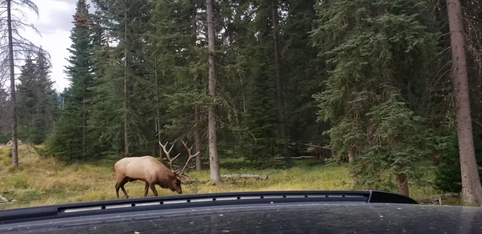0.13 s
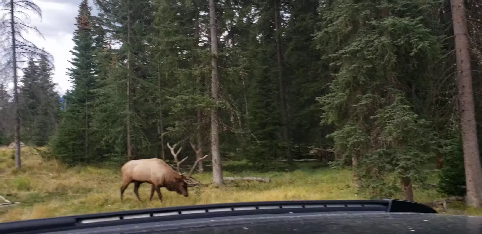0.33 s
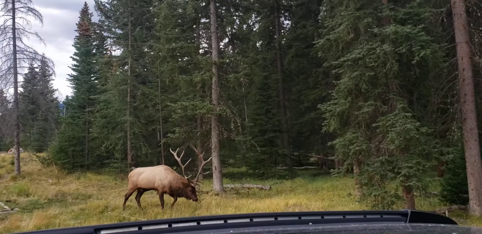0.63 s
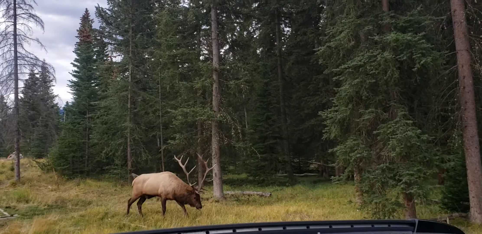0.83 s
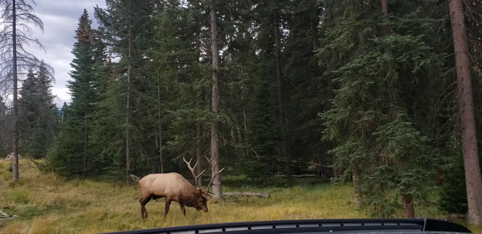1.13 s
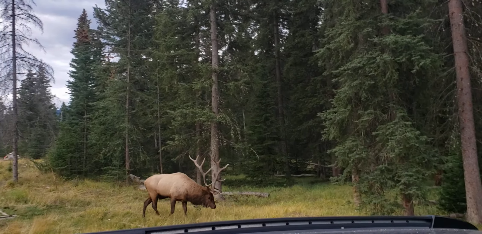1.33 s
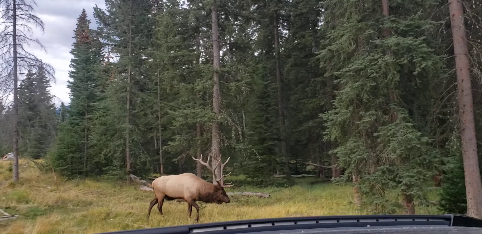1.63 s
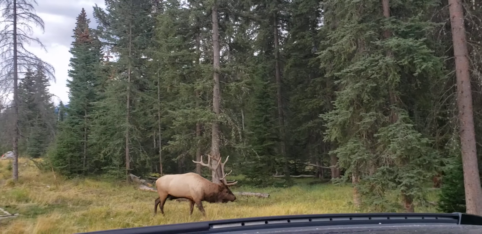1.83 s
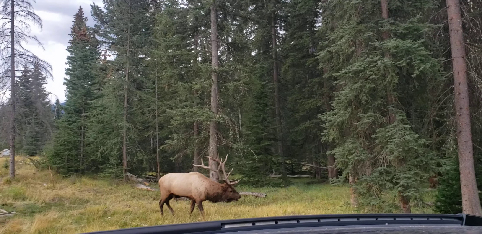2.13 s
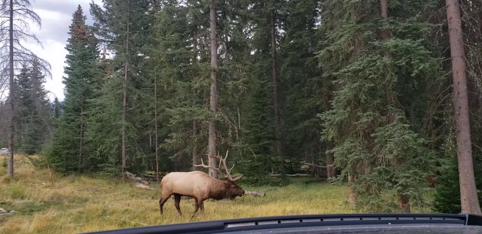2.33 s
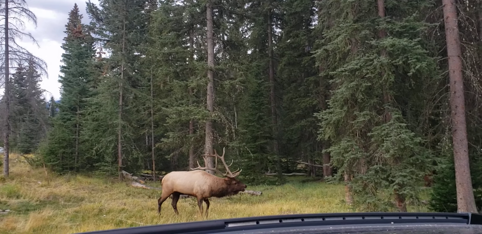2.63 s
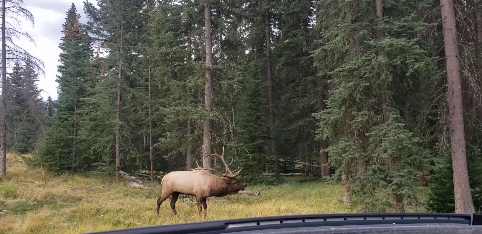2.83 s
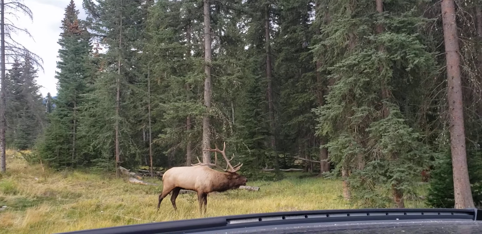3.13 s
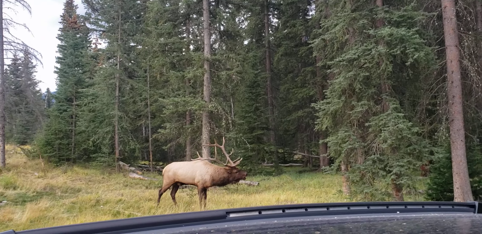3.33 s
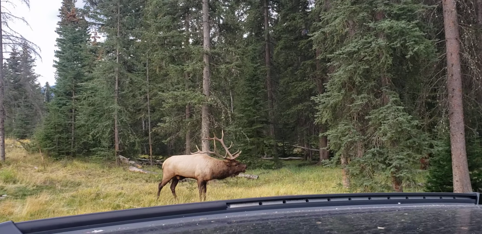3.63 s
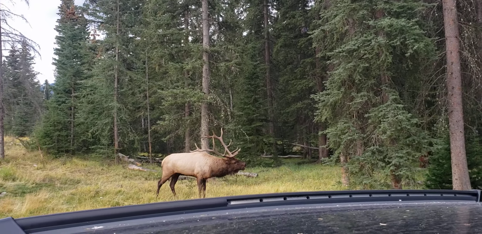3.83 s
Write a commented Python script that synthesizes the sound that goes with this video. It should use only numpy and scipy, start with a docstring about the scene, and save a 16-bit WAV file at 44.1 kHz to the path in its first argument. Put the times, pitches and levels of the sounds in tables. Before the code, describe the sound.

An elk's bugle dominates the second half. First, low engine rumble and faint forest air, with left-side wind bumps until about 0.5 s, a sharp knock on the right near 0.6 s, and close crackle, ticks and rustle, busiest again at 1.4-1.8 s. From 2.1 s a soft grunt and thin whistle climb in steps; at 2.75 s it breaks into a harsh, buzzing, growling scream, echoing off trees, turning hoarse and whistling near 4 s.

```python
"""Bull elk bugling in a forest clearing

Hand-held camera with two microphone ports, beside an idling car; the bull calls from across the clearing.
A thin whistle, a bent sine with overtones, climbs in steps. Then the vocal folds join in: pulses and puffs
ring the throat as growl and rasp, and a tone sweeps up once a fold cycle for the harsh scream. Decaying
noise scatters the call as echoes off the trees. Close by: wind bumps on the left port (short swelling low
tones), ticks, a knock, crackle and rustle of the hand (coloured noise bursts), rumble, hum, air and hiss."""
import sys
import numpy as np
from scipy import signal
from scipy.fft import rfft, irfft
from scipy.io import wavfile
from scipy.ndimage import uniform_filter1d

SR = 44100
rng = np.random.default_rng(int(sys.argv[2]) if len(sys.argv) > 2 else 0)


def waveform_to_disk(signal):
    """Save audio, clipped to [-1, 1], as 16-bit WAV at the path in sys.argv[1]."""
    frames = np.transpose(np.atleast_2d(signal))
    scaled = np.clip(frames, -1, 1) * 32767
    samples = np.round(scaled).astype(np.int16)
    wavfile.write(sys.argv[1], SR, samples)


N = 176400
T = np.arange(N) / SR


def undb(db):
    """Decibels to gain."""
    return 10 ** (np.asarray(db) / 20)


def curve(table, axis=1):
    """One column of a table, joined by straight lines in time."""
    rows = np.array(table, float)
    return np.interp(T, rows[:, 0], rows[:, axis])


def unit(x):
    """Scale to rms 1."""
    return x / np.sqrt(np.mean(x ** 2))


def noise():
    """White noise of rms 1."""
    return rng.standard_normal(N)


def walk(rate):
    """Smooth random wander with a spread of 1; a higher rate wanders faster."""
    width = max(int(SR / rate), 2)
    return unit(uniform_filter1d(uniform_filter1d(noise(), width), width))


def turning(hz):
    """Phase in radians of a tone whose pitch follows hz."""
    return 2 * np.pi * np.cumsum(hz) / SR


def colour(x, points, size=8192):
    """Causal minimum-phase filter whose response follows (f/Hz, level/dB) points."""
    hz, db = np.array(points, float).T
    f = np.maximum(np.arange(size // 2 + 1) * SR / size, 1)
    log_gain = np.log(undb(np.interp(np.log(f), np.log(hz), db)))
    # folding the cepstrum forward in time makes the filter causal
    cepstrum = irfft(log_gain)
    cepstrum[1:size // 2] *= 2
    cepstrum[size // 2 + 1:] = 0
    response = irfft(np.exp(rfft(cepstrum)))
    return signal.fftconvolve(x, response)[:N]


def pan(x, db):
    """Place a sound by its left minus right level."""
    return np.array([x * undb(db / 2), x * undb(-db / 2)])


def wide(points, side_db):
    """Coloured stereo noise: a middle of rms 1 and an independent side signal."""
    mid = unit(colour(noise(), points))
    side = unit(colour(noise(), points))
    return mid + undb(side_db) * np.array([side, -side])


def fade(start, decay):
    """Sudden start, exponential decay."""
    return (T >= start) * np.exp(-np.abs(T - start) / decay)


# colour of the microphone hiss: f/Hz, level/dB
HISS_COLOUR = [(3000, -16), (8500, -11.5), (11500, 1.5), (15500, 1.5)]
HISS_DB = -81.5


def hiss():
    """Steady treble noise of the microphones."""
    return wide(HISS_COLOUR, side_db=0) * undb(HISS_DB)


# colour of the forest air: f/Hz, level/dB
AIR_COLOUR = [(40, -15), (150, 3.5), (320, 7.5), (650, 5.5), (1100, -1.5), (1700, -26.5), (2400, -17),
              (3200, -46.5), (5000, -63.5), (7500, -70), (9000, -60)]
AIR_DB, AIR_SIDE_DB = -61, -6


def forest_air():
    """Faint air around the clearing: soft noise whose level wavers slightly."""
    return wide(AIR_COLOUR, AIR_SIDE_DB) * undb(AIR_DB + 0.93 * walk(15))


# partials of the engine hum: f/Hz, level/dB
ENGINE_HUM = [(52, -55), (103, -57.5)]
# colour of the car's rumble: f/Hz, level/dB
RUMBLE_COLOUR = [(15, -21.5), (28, -22.5), (42, 1.5), (54, 0.5), (70, 3), (102, -4.5), (122, -7.5),
                 (170, -24.5), (260, -36), (600, -66)]
# the rumble as it rises and falls: t/s, level/dB
RUMBLE_LEVEL = [(0, -43.5), (.55, -45.5), (.7, -49), (1.03, -54), (1.15, -46), (1.27, -53), (1.7, -49),
                (2.6, -48), (4, -50)]
RUMBLE_SIDE_DB = -10


def idling_car():
    """Low noise for the rumble, and two unsteady tones for the engine's hum."""
    hum = 0
    for hz, db in ENGINE_HUM:
        level = np.sqrt(2) * undb(db + 2 * walk(5.4))
        hum = hum + level * np.sin(turning(hz * (1 + 0.027 * walk(8.1))))
    return hum + wide(RUMBLE_COLOUR, RUMBLE_SIDE_DB) * undb(curve(RUMBLE_LEVEL))


# wind bumps at the left port: t/s where the swell peaks, level/dB, f/Hz
WIND_BUMPS = [(0.099, -32, 66), (.125, -28, 44.7), (0.194, -27, 71), (.28, -27, 50.7), (0.336, -30.5, 59.3),
              (0.392, -19.5, 73.6), (0.426, -25, 56)]
BUMP_S, BUMP_RIGHT_DB = 0.016, -41  # twice the rise time; right port relative to left
BUMP_CRUNCH = 0.52  # strength of the near-octave partial at the peak


def wind():
    """Short bumps of air, quick to rise and slower to fall, almost all on the left port."""
    left = 0
    for peak, db, hz in WIND_BUMPS:
        age = np.maximum(T - peak + BUMP_S / 2, 0)
        rise = age / BUMP_S * 2
        swell = rise * np.exp(1 - rise)
        phase = 2 * np.pi * hz * age
        bump = np.sin(phase) + BUMP_CRUNCH * swell * np.sin(1.97 * phase)
        left = left + undb(db) * swell * bump
    return np.array([left, left * undb(BUMP_RIGHT_DB)])


# skin sliding on the camera: t/s, level/dB
SLIDE_LEVEL = [(0, -76), (.1, -89), (.3, -80), (.42, -81), (.57, -84), (.61, -72.5), (.74, -74),
               (.86, -83.5), (.95, -99)]
# its colour: f/Hz, level/dB
SLIDE_COLOUR = [(2000, -26), (3100, -14.5), (3700, 1.5), (5200, 1.5), (5800, -19), (6500, -10.5),
                (7600, -9.5), (8500, -28)]


def sliding_skin():
    """Friction hiss of skin on the camera body, as treble noise."""
    return wide(SLIDE_COLOUR, side_db=-3.5) * undb(curve(SLIDE_LEVEL))


# crackle of the shifting grip: t/s, level/dB
CRACKLE_LEVEL = [(0, -55), (.2, -72), (.32, -57), (.42, -77), (.62, -65), (.8, -66.5), (.95, -89),
                 (1.3, -71.5), (1.37, -69), (1.42, -57), (1.49, -66), (1.55, -62), (1.68, -56),
                 (1.78, -60.5), (1.88, -79.5), (4, -84.5)]
# its colour: f/Hz, level/dB
CRACKLE_COLOUR = [(200, -2.5), (700, 5.5), (1300, 6), (2100, -4), (3000, -15.5), (4300, -17.5),
                  (7000, -25.5), (9000, -34), (15000, -33.5)]
CRACKLES_PER_S, CRACKLE_SPREAD_DB = 220, 2.5


def crackle():
    """Dense tiny clicks of the grip at random moments, of either sign and uneven size."""
    clicks = (rng.random(N) < CRACKLES_PER_S / SR) * rng.choice([-1, 1], N)
    size_db = CRACKLE_SPREAD_DB * np.minimum(rng.exponential(size=N), 3)
    coloured = unit(colour(clicks * undb(size_db), CRACKLE_COLOUR))
    return pan(coloured * undb(curve(CRACKLE_LEVEL)), 1.6)


# rustle of the hand: t/s, level/dB
RUSTLE_LEVEL = [(0, -58), (.33, -61.5), (.45, -65), (.62, -63.5), (.8, -63), (.95, -67.5), (1.3, -65.5),
                (1.42, -57.5), (1.49, -62), (1.76, -59.5), (1.86, -64), (2.08, -67), (2.15, -60.5),
                (2.7, -57), (4, -52)]
# its colour: f/Hz, level/dB
RUSTLE_COLOUR = [(200, -8), (700, 7), (1300, 1), (2200, -6), (3000, -19.5), (4600, -23), (6000, -21.5),
                 (7400, -23), (8600, -47.5)]


def rustle():
    """Hand moving at the microphone: stereo noise with a quick, grainy level."""
    return wide(RUSTLE_COLOUR, side_db=2.0) * undb(curve(RUSTLE_LEVEL) + 0.78 * walk(63))


# handling ticks: t/s, peak level/dB before the shared gain and panning, left minus right/dB
HANDLING_TICKS = [(0.253, -42.5, 5), (0.348, -39, 3), (0.594, -39, 4), (0.76, -48.5, 1), (0.789, -46, 2),
                  (1.278, -51, 0.5), (1.39, -35, 3), (1.414, -42, 5), (1.423, -42, 6), (1.444, -47, 5),
                  (1.531, -45, 3), (1.55, -45, 1), (1.628, -45, 1.5), (1.637, -36.5, 4), (1.666, -42.5, 1),
                  (1.706, -38, 1.5), (1.765, -36, 3.5), (1.776, -45, 1), (2.157, -47, -8), (2.325, -45, 3),
                  (2.596, -40, 3), (2.629, -44, 3.5)]
# colour of a tick: f/Hz, level/dB
TICK_COLOUR = [(200, 9), (700, 10.5), (1300, 16.5), (2100, 2.5), (3000, -14), (4200, -19.5), (7000, -26),
               (9000, -30), (15000, -39)]
TICK_DECAY_S, TICK_GAIN_DB = 0.0021, 2


def ticks():
    """Small contacts on the camera: coloured noise bursts that die within milliseconds."""
    out = 0
    for start, db, pan_db in HANDLING_TICKS:
        tick = colour(fade(start, TICK_DECAY_S) * noise(), TICK_COLOUR)
        out = out + pan(tick / np.abs(tick).max() * undb(db + TICK_GAIN_DB), pan_db)
    return out


# colour of the knock: f/Hz, level/dB
KNOCK_COLOUR = [(60, -5), (150, 11.5), (500, 5.5), (1000, -2.5), (1800, 0.5), (2600, -12.5), (4300, -7.5),
                (6000, -23), (9000, -41), (15000, -40)]
KNOCK_S, KNOCK_DB, KNOCK_PAN_DB = .5722, -25.5, -22.5  # start; peak before panning; left minus right
KNOCK_RING_DB, KNOCK_RING_S = -25, 0.0038  # noise after the blow: level below it; decay


def knock():
    """One sharp knock on the camera body, to the right: an impulse and a short noisy ring."""
    impulse = np.arange(N) == int(KNOCK_S * SR)
    ring = undb(KNOCK_RING_DB) * fade(KNOCK_S, KNOCK_RING_S) * noise()
    blow = colour(impulse + ring, KNOCK_COLOUR)
    return pan(blow / np.abs(blow).max() * undb(KNOCK_DB), KNOCK_PAN_DB)


# Levels of the call's voices are those at the elk, before direct gain, ports, panning and echo.
GRUNT_S, GRUNT_LEN_S, GRUNT_DB = 2.11, 0.082, -44  # centre; Gaussian half-width; level
GRUNT_HZ, GRUNT_SAG_HZ_PER_S = 125, 110  # pitch at the centre; rate of fall
# partials of the grunt: multiple of the pitch, level/dB
GRUNT_PARTIALS = [(1, 1), (2, -16), (5, -8)]


def grunt():
    """A soft low falling note, voiced under the start of the whistle."""
    phase = turning(GRUNT_HZ - GRUNT_SAG_HZ_PER_S * (T - GRUNT_S))
    tone = sum(undb(db) * np.sin(round(multiple) * phase) for multiple, db in GRUNT_PARTIALS)
    return tone * np.exp(-((T - GRUNT_S) / GRUNT_LEN_S) ** 2) * undb(GRUNT_DB)


# hoarse air as the scream breaks up: t/s, level/dB
HOARSE_LEVEL = [(3.76, -80.5), (3.83, -53), (3.9, -39.5), (3.96, -45), (4, -49)]
# its colour: f/Hz, level/dB
HOARSE_COLOUR = [(250, -26.5), (600, -8), (920, 2), (1100, -3.5), (1400, 5.5), (2000, -4.5), (2600, -2.5),
                 (3000, -6), (3300, -30.5), (4400, -19), (5200, -36), (8000, -46), (9500, -63)]


def hoarse(turns):
    """Gusts of air, one a fold cycle, tear through the folds as the scream breaks up."""
    gusts = (1 + .5 * np.cos(2 * np.pi * turns)) * noise()
    return unit(colour(gusts, HOARSE_COLOUR)) * undb(curve(HOARSE_LEVEL))


# thin squeal that falls into the closing whistle: t/s, f/Hz, level/dB
SQUEAL_PATH = [(3.52, 2680, -88), (3.62, 2676, -48.5), (3.79, 2690, -54), (3.85, 2930, -55),
               (3.905, 2970, -48), (3.95, 2720, -44), (3.975, 2650, -48), (3.995, 2400, -78)]


def squeal(turns):
    """A second, higher whistle, shaken in pitch and level once a fold cycle."""
    beat = np.sin(2 * np.pi * turns)
    tone = np.sin(turning(curve(SQUEAL_PATH) + 90 * beat))  # swings by 90 Hz
    return tone * (1 + .5 * beat) * undb(curve(SQUEAL_PATH, axis=2))


GROWL_FLICKER_DB, GROWL_FLICKER_PER_S = 2.3, 12  # spread and rate of the uneven swelling


def flicker(x):
    """Each narrow band of the growl swells and fades on its own."""
    f, spectrum = np.arange(N // 2 + 1) * SR / N, rfft(x)
    for hz in range(330, 1100, 85):
        band = irfft(spectrum * np.clip(1 - np.abs(f - hz) / 85, 0, 1), N)
        x = x + band * (undb(GROWL_FLICKER_DB * walk(GROWL_FLICKER_PER_S)) - 1)
    return x


# growl over the call: t/s, level/dB
GROWL_LEVEL = [(2.72, -75), (2.76, -54), (2.84, -42.5), (3.08, -37), (3.22, -36.5), (3.42, -37), (3.7, -38),
               (3.77, -45), (3.83, -38.5), (3.91, -39), (3.96, -43), (3.99, -48.5)]
# low throat resonances: f/Hz, level/dB
LOW_THROAT = [(60, -38.5), (85, 4.5), (130, -4.5), (170, -3), (210, -33.5), (255, -1), (295, -4),
              (335, -7.5), (415, -7), (500, 2.5), (570, 2), (655, 6.5), (720, -14), (790, -23.5), (870, -8),
              (935, 1.5), (1030, -21.5), (1200, -33.5), (1600, -71.5)]
# chest tone, the folds' second harmonic: t/s, level/dB
CHEST_LEVEL = [(2.75, -61.5), (2.9, -68), (3.2, -68), (3.4, -48.5), (3.75, -45.5), (3.92, -49), (3.98, -58)]
# rasp, strongest as the folds come apart: t/s, level/dB
RASP_LEVEL = [(2.72, -80), (2.765, -42), (2.84, -44), (3.1, -41), (3.45, -39.5), (3.75, -40), (3.86, -38),
              (3.95, -37), (3.99, -54)]
# high throat resonances: f/Hz, level/dB
HIGH_THROAT = [(600, -50), (1220, -26), (1410, 6.5), (1530, -7.5), (1735, 6), (1870, -2.5), (2100, 4),
               (2230, 0), (2450, 2.5), (2600, -7.5), (3200, -30.5), (3600, -33), (3820, -1.5), (3980, -37),
               (4180, -1), (4450, -12.5), (4800, -53.5), (5800, -19.5), (6600, -41.5), (7350, -21.5),
               (8300, -47), (12000, -77)]
GROWL_AIR, RASP_AIR = .16, .65  # puffs of air relative to the fold pulses
PUFF_DECAY = .25  # fold cycles


def folds(turns):
    """Fold pulses and puffs of air ring the low and high throat resonances."""
    hz = np.gradient(turns) * SR
    offset = ((turns + .5) % 1 - .5) * SR / hz  # samples from the nearest pulse
    pulses = unit(np.sinc(offset) * np.exp(-(offset / 6) ** 2)) * undb(.7 * walk(90))
    puffs = unit(np.exp(-(turns % 1) / PUFF_DECAY) * noise())
    growl = unit(flicker(colour(pulses + GROWL_AIR * puffs, LOW_THROAT))) * undb(curve(GROWL_LEVEL))
    chest = np.sqrt(2) * np.cos(4 * np.pi * turns) * undb(curve(CHEST_LEVEL))
    rasp = unit(colour(pulses + RASP_AIR * puffs, HIGH_THROAT)) * undb(curve(RASP_LEVEL))
    return growl + chest, rasp


# mouth's colour on the overtones of whistle and chirps: f/Hz, level/dB
MOUTH_COLOUR = [(2500, 2.5), (3200, -6.5), (3650, -5.5), (4150, 0), (4450, -12), (4900, -30), (5500, -15),
                (6200, 2), (6700, -8.5), (7300, 1), (8300, -30.5), (10000, -15.5), (12000, -17.5)]
# whistle pitch, climbing in steps and returning at the end: t/s, f/Hz
WHISTLE_PITCH = [(2.06, 690), (2.11, 715.4), (2.176, 900.4), (2.21, 982), (2.262, 1040), (2.28, 1257),
                 (2.31, 1304), (2.345, 1534), (2.37, 1596), (2.385, 1730), (2.42, 1825), (2.445, 1775),
                 (2.47, 1657), (2.49, 1745), (2.535, 1799), (2.6, 1954), (2.675, 2025), (2.73, 2202),
                 (2.748, 1765), (2.8, 1726), (3.955, 2078), (3.98, 2182)]
# whistle fundamental: t/s, level/dB
WHISTLE_LEVEL = [(2.05, -75), (2.08, -54), (2.112, -43), (2.145, -60), (2.185, -47), (2.222, -37.5),
                 (2.252, -38), (2.277, -57), (2.3, -52.5), (2.345, -49), (2.368, -38.5), (2.39, -44.5),
                 (2.44, -46.5), (2.458, -38.5), (2.495, -37.5), (2.535, -32.5), (2.575, -42.5),
                 (2.66, -40.5), (2.71, -38.5), (2.73, -40), (2.754, -29.5), (2.768, -38), (2.79, -41.5),
                 (2.85, -62), (3.0, -91), (3.92, -81), (3.965, -31), (3.988, -25.5)]
# roughness of the whistle: t/s, phase wobble/rad
WHISTLE_WOBBLE = [(2.05, .15), (2.25, .12), (2.32, .35), (2.37, .3), (2.41, .2), (2.455, .7), (2.485, .4),
                  (2.52, .15), (2.62, .2), (2.71, .08), (2.73, 1.3), (2.75, .15), (2.77, .6), (3.96, .6),
                  (3.985, .12)]
# harmonics 2 to 6 against each other: level/dB
OVERTONE_BALANCE = [0, -7, -7, -11, -17]
# all overtones together, before the mouth: t/s, level/dB
OVERTONE_LEVEL = [(2.1, -80), (2.17, -64), (2.24, -67), (2.3, -62), (2.34, -58), (2.38, -65), (2.45, -68),
                  (2.53, -67), (2.6, -71), (2.66, -62), (2.705, -56), (2.74, -70), (2.85, -90), (3.95, -82),
                  (3.99, -61)]
WHISTLE_SCATTER_HZ, OVERTONE_FLICKER_DB = 12, 2.5  # wander of pitch; spread as overtones come and go


def whistle():
    """A near-pure tone that climbs in steps and turns ragged at the breaks."""
    rough = curve(WHISTLE_WOBBLE)
    phase = turning(curve(WHISTLE_PITCH) + WHISTLE_SCATTER_HZ * walk(120)) + rough * walk(450)
    ragged = (1 + .6 * rough * walk(350)) / np.hypot(1, .6 * rough)  # keeps the mean power
    flutter = np.sqrt(2) * undb(.8 * walk(70)) * ragged
    overtones = sum(undb(db) * np.sin((k + 2) * phase) for k, db in enumerate(OVERTONE_BALANCE))
    edge = flutter * overtones * undb(curve(OVERTONE_LEVEL) + OVERTONE_FLICKER_DB * walk(45))
    return flutter * np.sin(phase) * undb(curve(WHISTLE_LEVEL)) + colour(edge, MOUTH_COLOUR)


# pitch of the vocal folds, also the rate of the chirps: t/s, f/Hz
FOLD_PITCH = [(2.78, 88.4), (2.81, 87.57), (2.85, 82.68), (3.004, 82.2), (3.068, 79.84), (3.274, 82.04),
              (3.318, 83.73), (3.348, 83.3), (3.4, 85), (3.46, 83.16), (3.692, 83.2), (3.77, 86.73),
              (3.824, 91), (3.872, 91.77), (3.932, 89.24), (3.99, 92.3)]
# sweep of each chirp: t/s, starting f/Hz, closing f/Hz
CHIRP_SWEEP = [(2.76, 1327, 1940), (2.8, 1344, 2400), (2.86, 1337, 2580), (3.2, 1367, 2580),
               (3.5, 1372, 2560), (3.8, 1412, 2508), (3.95, 1231, 2607)]
# chirps over the call: t/s, level/dB
CHIRP_LEVEL = [(2.74, -65), (2.775, -32), (2.81, -33), (2.85, -31.5), (2.97, -31.5), (3.06, -29.5),
               (3.095, -32.5), (3.13, -27.5), (3.18, -30.5), (3.25, -29), (3.295, -31.5), (3.34, -29),
               (3.42, -28.5), (3.58, -28), (3.73, -31), (3.79, -28.5), (3.87, -33), (3.95, -31),
               (3.985, -34.5)]
# length of a chirp: t/s, share of the fold cycle
CHIRP_LENGTH = [(2.8, .5), (2.9, .57), (3.25, .6), (3.45, .74), (3.8, .78), (3.95, .85)]
# where a chirp is strongest: t/s, share of the chirp
CHIRP_PEAK = [(2.8, 0.28), (3.15, 0.34), (3.45, 0.51), (3.75, 0.5), (3.95, 0.41)]
# throat's colour on the chirps: f/Hz, level/dB
CHIRP_THROAT = [(1080, -3.5), (1230, -15.5), (1410, 7.5), (1540, -5.5), (1730, 8), (1830, -4), (1930, -0.5),
                (2010, -1.5), (2100, 8.5), (2180, -1), (2260, 1.5), (2450, 4), (2620, -8), (2850, -17),
                (3200, -28.5), (5000, -36.5)]
CHIRP_FULLNESS, CHIRP_OVERTONE_DB = 1.1, -29.5  # power of the swell; octave against the tone
CHIRP_SCATTER_HZ, CHIRP_SCATTER_DB = 17, .9  # spread from chirp to chirp


def chirps(turns):
    """The folds chop the whistle: once a cycle it starts low, sweeps up and is cut off."""
    index, share = turns.astype(int), curve(CHIRP_LENGTH)
    detune, size = rng.standard_normal((index.max() + 1, 2))[index].T
    along = np.minimum(turns % 1 / share, 1)  # 0 to 1 through the chirp
    low = curve(CHIRP_SWEEP) + CHIRP_SCATTER_HZ * detune
    high = curve(CHIRP_SWEEP, axis=2)
    phase = 2 * np.pi * along * share / curve(FOLD_PITCH) * (low + (high - low) * along / 2)
    skew = np.log(.5) / np.log(np.clip(curve(CHIRP_PEAK), .15, .85))  # puts the peak in its place
    swell = np.abs(np.sin(np.pi * along ** skew)) ** CHIRP_FULLNESS
    swell = swell * undb(CHIRP_SCATTER_DB * size)
    tone = unit(colour(swell * np.sin(phase), CHIRP_THROAT))
    octave = unit(colour(swell * np.sin(2 * phase), MOUTH_COLOUR)) * undb(CHIRP_OVERTONE_DB)
    return (tone + octave) * undb(curve(CHIRP_LEVEL))


FOREST_DB, FOREST_T60_S, FOREST_DELAY_S = -9.5, 0.65, 0.011  # level; 60 dB decay; first echo


def forest(x):
    """Scattered echoes from the trunks: decaying noise, different at each port."""
    tails = fade(FOREST_DELAY_S, FOREST_T60_S / np.log(1000)) * rng.standard_normal((2, N))
    echoes = [signal.fftconvolve(x, tail / np.sqrt(np.sum(tail ** 2)))[:N] for tail in tails]
    return undb(FOREST_DB) * np.array(echoes)


# level of the call between the ports: f/Hz, left minus right/dB
PORT_LEVEL = [(60, 0.5), (95, 1.1), (150, 0.77), (240, 2.3), (380, 1.4), (610, 1), (960, 2.1), (1530, 7.2),
              (2430, 0.5), (3860, 0.8)]
# phase of the call between the ports: f/Hz, lead of the left/rad
PORT_LEAD = [(50, 0), (780, .5), (1380, .4), (1640, 0), (2150, 0), (2760, .9), (3450, 2.1), (3790, 1),
             (4100, 1.8), (8000, 1.7)]


def ports(x):
    """The two microphone ports hear a distant source with different colour and phase."""
    f = np.arange(N // 2 + 1) * SR / N
    db, lead = (np.interp(f, *np.array(table, float).T) for table in (PORT_LEVEL, PORT_LEAD))
    half = undb(db / 2) * np.exp(.5j * lead)
    return irfft(rfft(x) * np.array([half, 1 / half]), N)


# unsteadiness of the folds: t/s, spread as a share of their pitch
FOLD_JITTER = [(2.76, .07), (2.84, .01), (3.3, .011), (3.45, .006), (3.7, .007), (3.85, .016), (3.96, .05)]
# further panning of the direct call: t/s, left minus right/dB
CALL_SIDE = [(2.1, 0), (2.5, 2.5), (2.8, 1.5), (3.3, 0.5), (3.9, 0)]
CHIRP_LEAD = .36  # fold cycles by which a chirp leads the fold pulse
DIRECT_GAIN, LOW_ECHO_GAIN = 0.73, 0.71  # call straight to the ports; growl and grunt into the echo


def elk():
    """Whistle and folds share one throat, centred or a little to the left."""
    turns = np.cumsum(curve(FOLD_PITCH) * (1 + curve(FOLD_JITTER) * walk(90))) / SR  # fold cycles
    growl, rasp = folds(turns)
    scream = whistle() + chirps(turns + CHIRP_LEAD) + rasp + squeal(turns) + hoarse(turns)
    low = growl + grunt()
    direct = ports(scream + low) * pan(DIRECT_GAIN, curve(CALL_SIDE))
    return direct + forest(scream + LOW_ECHO_GAIN * low)


def scene():
    """The small sounds at the car and the camera, and the elk across the clearing."""
    background = hiss() + forest_air() + idling_car()
    close = wind() + sliding_skin() + crackle() + rustle() + ticks() + knock()
    return background + close + elk()


TOP_HZ = 15750


def record(dry):
    """The camera cuts the deepest bass and the top."""
    thin = signal.sosfilt(signal.butter(3, 30, "high", fs=SR, output="sos"), dry)
    return signal.sosfilt(signal.ellip(10, .2, 70, TOP_HZ, fs=SR, output="sos"), thin)


dry = scene()
out = record(dry)
waveform_to_disk(out)
```